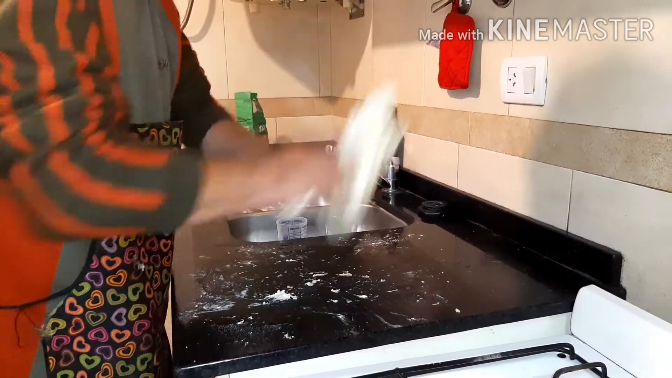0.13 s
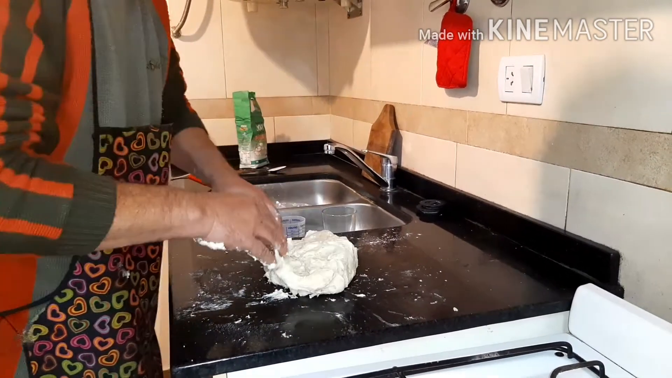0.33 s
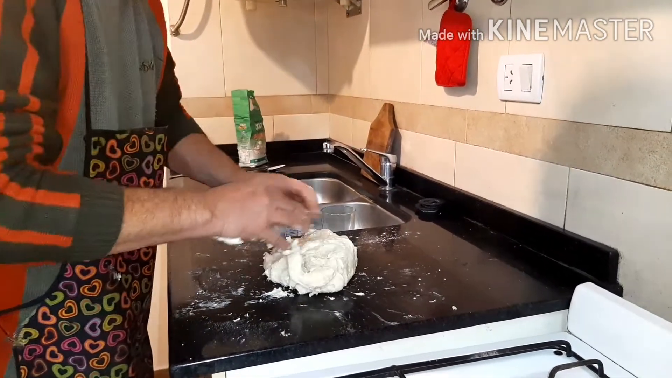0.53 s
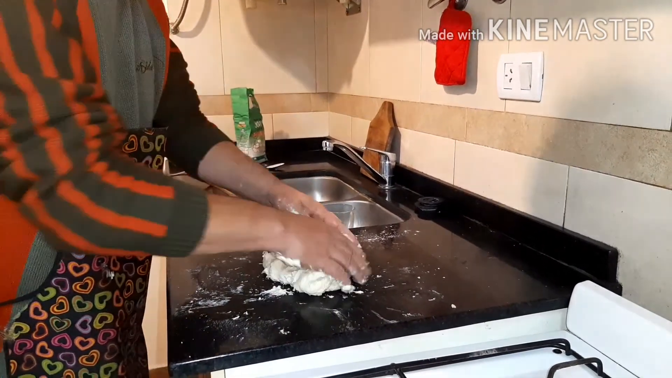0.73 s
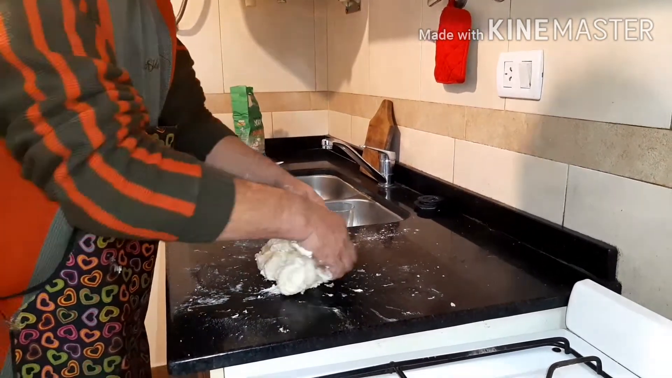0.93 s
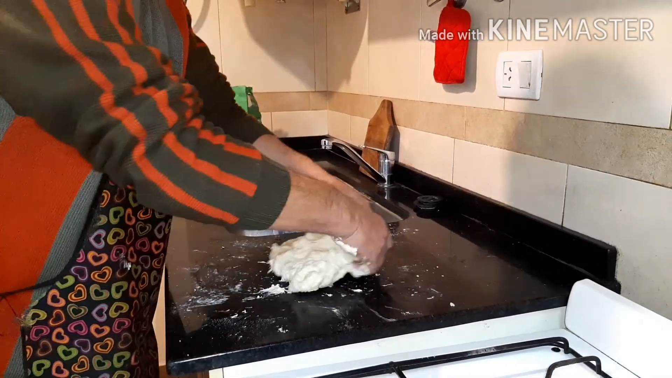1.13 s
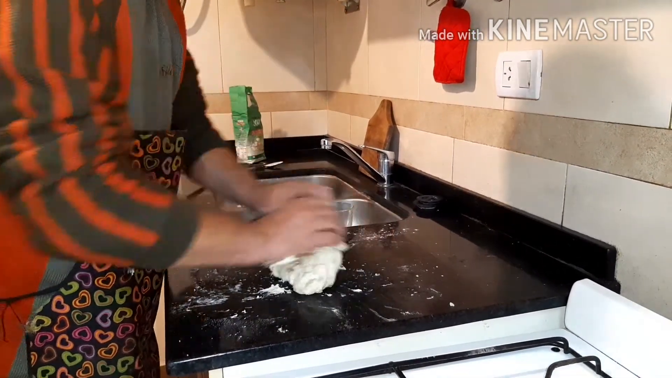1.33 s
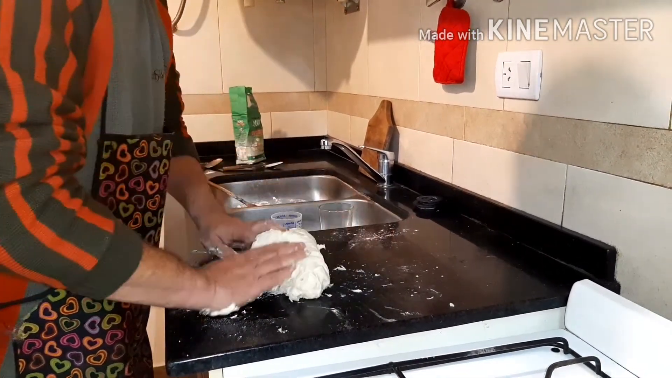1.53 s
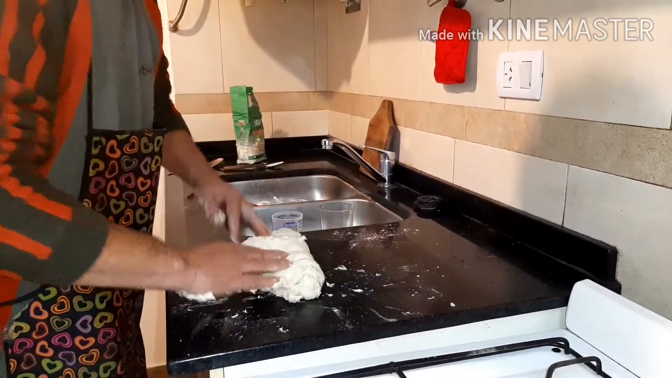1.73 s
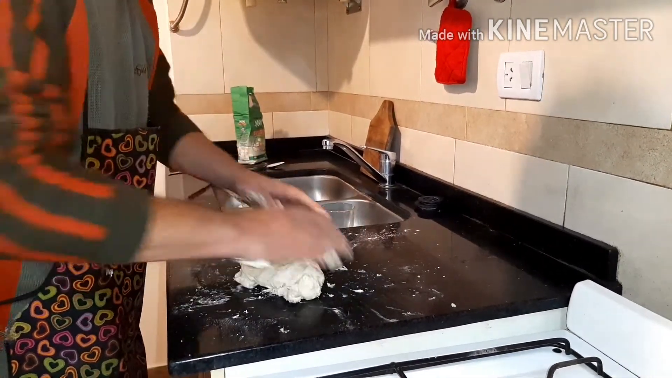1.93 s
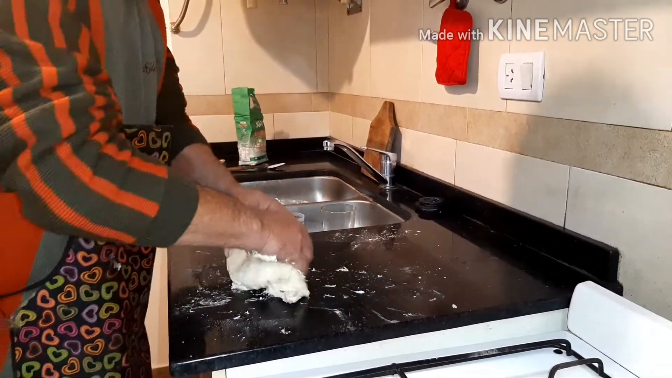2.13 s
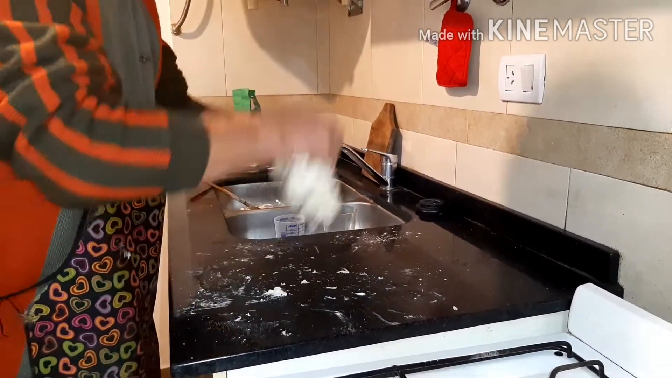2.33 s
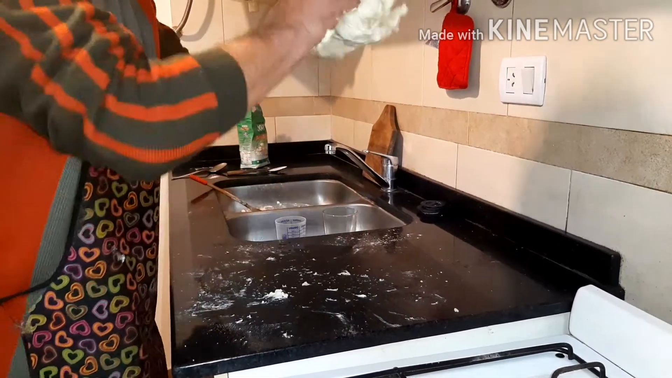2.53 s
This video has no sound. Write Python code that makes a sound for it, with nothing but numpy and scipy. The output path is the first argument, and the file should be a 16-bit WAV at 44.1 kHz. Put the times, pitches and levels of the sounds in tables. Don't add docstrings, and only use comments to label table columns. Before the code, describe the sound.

Dough is slammed on a stone kitchen counter: after faint sleeve rustle, a loud wet smack and deep thud land at 0.2 s, cabinets booming and tiles ringing about half a second. Much softer knocks follow at 0.7 s, very faint ones near 1.05 s, then a near-quiet pause. Soft double bumps with a small slap come at 2.03 s; cloth rustle rises by 2.5 s. Low fridge hum throughout, close stereo phone.

```python
import sys
import numpy as np
from scipy import signal
from scipy.fft import rfft, irfft
from scipy.io import wavfile
from scipy.ndimage import uniform_filter1d

SR = 44100
rng = np.random.default_rng(int(sys.argv[2]) if len(sys.argv) > 2 else 0)


def master_out(mix):
    frames = np.transpose(np.atleast_2d(mix))
    ceiling = np.clip(frames, -1, 1)
    pcm = np.round(ceiling * 32767).astype(np.int16)
    wavfile.write(sys.argv[1], SR, pcm)


def undo_db(level):
    steps = np.asarray(level, float) / 20
    return 10 ** steps


N = 114660
T = np.arange(N) / SR
LEFT_RIGHT = np.array([[1], [-1]])
DRIFT_DB = 1.5

# frequency in Hz, level in dB, decay by 60 dB in seconds, left-right likeness 0-1.
ROOM_RESPONSE = [(60, -21.5, 0.36, 0.69), (150, -26, 0.47, 0.93), (430, -23, 0.43, 0.72),
                 (1000, -17, 0.5, 0.37), (2500, -19.5, 0.51, 0), (6130, -16.5, 0.34, 0.14),
                 (10000, -19.5, 0.25, 0.3), (15000, -16, 0.23, 0.2)]


def band(x, hz, width):
    f = np.fft.rfftfreq(x.shape[-1], 1 / SR)
    bell = np.exp(-.5 * ((f - hz) / (width / 2)) ** 2)
    return irfft(rfft(x) * bell, x.shape[-1])


def unit(x):
    return x / np.sqrt(np.mean(x ** 2))


def pair(size, like):
    like = np.clip(like, 0, 1)
    mid, side = rng.standard_normal((2, size))
    return np.sqrt((1 + like) / 2) * mid + np.sqrt((1 - like) / 2) * side * LEFT_RIGHT


def walk(rate):
    k = int(SR / rate)
    steps = np.repeat(rng.standard_normal(N // k + 1), k)
    smooth = uniform_filter1d(uniform_filter1d(steps, k), k)
    return unit(smooth[:N])


def on_log(hz, table, column):
    table = np.array(table)
    return np.interp(np.log(hz), np.log(table[:, 0]), table[:, column])


def thuds(pushes):
    out = np.zeros(N)
    for start, db, hz, cycles in pushes:
        t = np.clip(T - start, 0, None)
        decay = np.exp(-1.6 * hz * t / cycles)
        soft_onset = 1 - np.exp(-t * hz * 9)
        out -= undo_db(db) * np.sin(2 * np.pi * hz * t) * decay * soft_onset
    return out


def dough_landing():
    # start in seconds, peak in dB, pitch in Hz, cycles of ring.
    surges = [(.2102, -14.5, 570, 0.86), (.2128, -4, 390, 0.95), (.2152, -3.5, 294, 0.66),
              (.2215, -5, 285, 0.63), (0.2248, -8.5, 111, 1.53), (.2277, -2, 229, 0.86),
              (.2357, -15, 238, 2.8), (0.2456, -21.5, 174, 1.5), (.267, -14, 212.5, 2.5),
              (.28, -21.5, 262, 1.7), (.405, -35, 123, 4.1), (.465, -36, 120.1, 2.7)]
    return thuds(surges)


def smacks():
    # start in seconds, peak in dB, length in ms, centre in Hz, width in Hz.
    wet_bursts = [(.2114, -5, 1.8, 2500, 990), (.2113, -8, 2.53, 11700, 6700),
                  (.2113, -10, 3.14, 3500, 4400), (.212, -14.5, 5, 615, 205), (0.21, -12.5, 3.3, 1160, 970),
                  (.72, -50.5, 9.5, 690, 900), (.47, -44.5, 7.1, 9100, 11000), (1.03, -54, 3, 11000, 7900),
                  (1.039, -60, 12, 1200, 2260), (1.2, -56, 4.3, 11000, 5600), (1.669, -51, 2, 9300, 8100),
                  (2.018, -42.5, 3.8, 10000, 2970), (2.028, -67, 4.5, 10500, 3000),
                  (2.0346, -28, 2.9, 3200, 2900), (2.04, -52, 7.2, 870, 370)]
    echo_db, lead_s = 8.5, .01
    direct, to_room = np.zeros(N), np.zeros(N)
    t = np.arange(2048) / SR - lead_s
    for start, db, ms, hz, width in wet_bursts:
        u = np.clip(t * 1000 / ms, 0, None)
        swell = u * np.exp(-2.4 * u ** 2)
        uneven = undo_db(6.8 * rng.standard_normal(len(t)))
        burst = band(rng.standard_normal(len(t)) * uneven * swell, hz, width)
        burst = undo_db(db) * burst / np.abs(burst).max()
        click = band(1. * (np.arange(len(t)) == 500), hz, 1.5 * width)
        i = int((start - lead_s) * SR)
        direct[i:i + len(t)] += burst
        to_room[i:i + len(t)] += unit(click) * undo_db(db - 40.5 + echo_db) * np.sqrt(ms)
    return direct, to_room


def gathering_hands():
    # start in seconds, peak in dB, pitch in Hz, cycles of ring.
    knocks = [(.7095, -32.5, 270, 0.95), (.7155, -27, 176, 2.6), (0.7269, -28.5, 222, 1.05),
              (.727, -27.5, 99.5, 4.3), (0.7689, -36, 225, 0.43), (.77, -32, 92, 1.5),
              (.779, -35.5, 284.5, 4.6), (.796, -41.5, 285, 3.4), (0.8141, -41, 175, 3.4),
              (1.037, -47, 795, 5.3), (1.046, -37, 322, 1.8), (1.062, -56, 390, 1.8),
              (1.775, -51, 137, 5.6), (1.879, -57.5, 139, 9.5), (2.027, -26.5, 150, 1.8),
              (2.0402, -25, 184, 3.2), (2.0547, -31.5, 322, 3.4), (2.062, -35, 174, 2.9),
              (2.10, -38, 262, 2.8), (2.115, -39, 129, 4.4), (2.16, -42, 74.3, 2.4), (2.229, -54, 93, 1.9),
              (2.33, -55, 228, 9.8), (2.489, -46, 107, 4.6)]
    return thuds(knocks)


def counter(push):
    # frequency in Hz, level in dB, decay by 60 dB in seconds.
    slab_modes = [(68.3, -24, .4), (92, -12, 0.57), (115, -16.5, 0.11), (141, -9.5, 0.143), (175, -4, 0.24),
                  (234.7, -20, 0.71), (293, -18.5, 0.26), (349, -18.5, 0.13), (378.7, -12, 0.28),
                  (444, -19, 0.23), (564, -17, 0.27), (699, -16.5, 0.18)]
    t, ring = T[:SR], 0
    for hz, db, t60 in slab_modes:
        ring = ring + undo_db(db) * hz * np.sin(2 * np.pi * hz * t) * 1000. ** (-t / t60)
    return signal.fftconvolve(push, ring / SR)[:N]


def room(x):
    early_gain, early_s, build_s = 1.03, 0.011, 0.0011
    t, tail = T[:SR], 0
    for hz in 45 * 2 ** np.arange(0, 8.6, .5):
        like = on_log(hz, ROOM_RESPONSE, column=3)
        noise = band(pair(SR, like), hz, hz * 0.44)
        level = undo_db(on_log(hz, ROOM_RESPONSE, column=1))
        t60 = on_log(hz, ROOM_RESPONSE, column=2)
        tail = tail + noise * level * 1000. ** (-t / t60)
    tail = tail * (1 - np.exp(-t / build_s)) * (1 + early_gain * np.exp(-t / early_s))
    return signal.fftconvolve(x[None], tail * undo_db(-8.5), axes=1)[:, :N]


def rustle():
    # time in seconds, level in dB, brightness in dB of the top over the middle.
    effort = [(0, -80.5, 7), (.07, -69.5, 8), (.13, -80.5, 4), (.2, -73, 18), (0.449, -61.5, 0),
              (0.621, -70, -6), (.87, -69, 5), (.96, -75.5, 3), (1.301, -93, 17), (1.39, -81, 12.5),
              (1.5, -94.5, 13), (1.77, -76, 12.5), (1.9, -81.5, 5), (2.05, -66.5, 5.5), (2.26, -70, 10),
              (2.38, -82, 7.5), (2.49, -63, -11), (2.6, -62.5, -5)]
    seconds, level_db, bright_db = np.array(effort).T
    flicker_db = 1.2

    def grain(hz, width):
        noise = pair(N, 0.24) * undo_db(2.5 * rng.standard_normal(N))
        return unit(band(noise, hz, width)) * undo_db(flicker_db * walk(25))

    middle = grain(4530, 2200)
    treble = grain(12200, 10000) * undo_db(np.interp(T, seconds, bright_db))
    return undo_db(np.interp(T, seconds, level_db)) * (middle + treble)


def work_stir():
    # time in seconds, level in dB.
    activity = [
        (0, 1.1),
        (.9, 0.5),
        (1.2, -3.9),
        (1.6, 0.2),
        (1.8, 3),
        (2.2, 6.5),
        (2.4, 3.5),
        (2.6, 5.5),
    ]
    return np.interp(T, *np.array(activity).T)


def room_tone(stir):
    # frequency in Hz, level in dB per Hz.
    tone_spectrum = [(15, -61), (25, -51), (69, 1), (164, -14), (457, -18.5), (703, -25.5), (2060, -28.5),
                     (4040, -45), (15500, -46)]
    tone = 0
    for hz in 30 * 2 ** np.arange(0, 9.1, 1 / 3):
        db = on_log(hz, tone_spectrum, column=1) + DRIFT_DB * walk(6.58)
        like = on_log(hz, ROOM_RESPONSE, column=3)
        tone = tone + undo_db(db) * band(pair(N, like), hz, hz * 0.26)
    tone = unit(tone) * undo_db(-53)
    return tone + band(tone, 160, 1656) * (undo_db(stir) - 1)


def fridge(stir):
    # frequency in Hz, width in Hz, level in dB.
    fan_resonances = [(2005, 520, -68.5), (6740, 230, -83), (1290, 150, -82), (10100, 250, -92),
                      (2640, 700, -76)]
    # frequency in Hz, level in dB.
    hum_lines = [(70, -60.5), (447, -75.5), (1389, -82.5), (2083, -74.5), (6395, -83.5)]
    out = 0
    for hz, width, db in fan_resonances:
        level = undo_db(db + DRIFT_DB * walk(2.7) + 0.76 * stir)
        out = out + level * unit(band(pair(N, 0.9), hz, width))
    for hz, db in hum_lines:
        level = np.sqrt(2) * undo_db(db + DRIFT_DB * walk(1.6))
        phase = 2 * np.pi * np.cumsum(hz * (1 + 0.0018 * walk(2.1))) / SR
        out = out + level * np.sin(phase)
    return out


def to_stereo(mix):
    right_early_ms, bass_left_db, treble_left_db = .16, 1.73, 1.3
    mix = np.array([mix[0], np.roll(mix[1], -int(right_early_ms * SR / 1000))])
    bass = signal.sosfilt(signal.butter(1, 500, fs=SR, output="sos"), mix)
    return bass * undo_db(bass_left_db * LEFT_RIGHT) + (mix - bass) * undo_db(treble_left_db * LEFT_RIGHT)


def scene():
    landing, hands = dough_landing(), gathering_hands()
    smack, smack_to_room = smacks()
    low = landing + hands + counter(landing + undo_db(-5.5) * hands)
    low = signal.sosfiltfilt(signal.butter(2, 57.6, "high", fs=SR, output="sos"), low)
    stir = work_stir()
    background = rustle() + room_tone(stir) + fridge(stir)
    return to_stereo(low + undo_db(1) * smack + room(low + smack_to_room) + background)


def low_pass(x):
    return signal.sosfilt(signal.butter(12, 16470, fs=SR, output="sos"), x)


def record(dry):
    # frequency in Hz, width in Hz, depth 0-1.
    housing_notches = [(1620, 300, .45), (8900, 1800, .35), (3600, 600, .15)]
    x = dry - sum(np.clip(depth, 0, .9) * band(dry, hz, width) for hz, width, depth in housing_notches)
    x = signal.sosfilt(signal.butter(1, 30, "high", fs=SR, output="sos"), x)
    limited = np.tanh(x * .7) / .72
    x = signal.sosfilt(signal.ellip(10, .2, 70, 15650, fs=SR, output="sos"), limited)
    return low_pass(x)


dry = scene()
out = record(dry)
master_out(out)
```